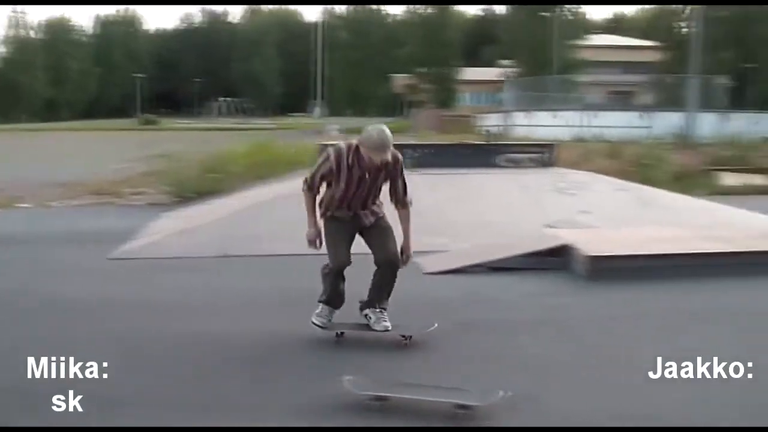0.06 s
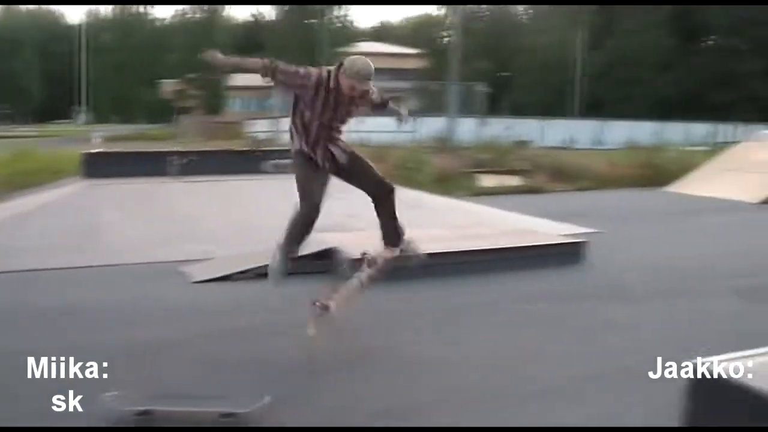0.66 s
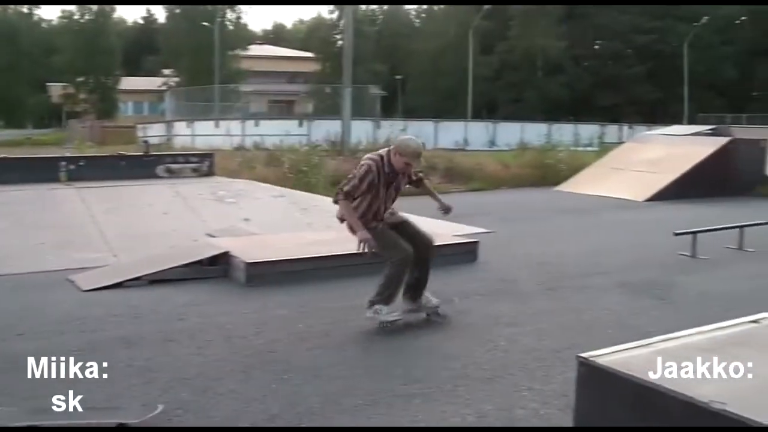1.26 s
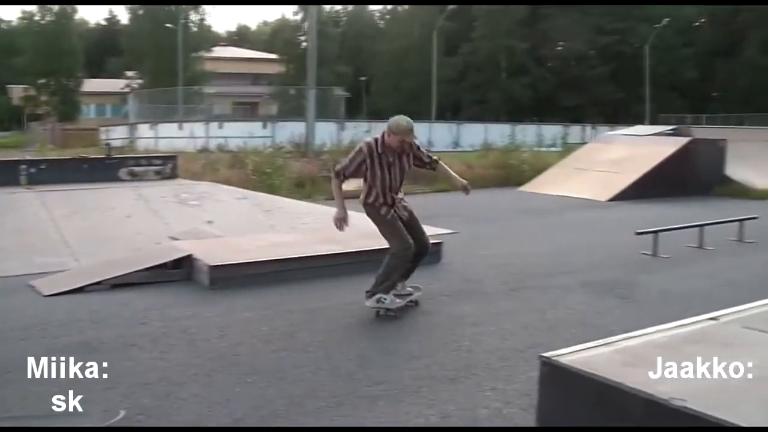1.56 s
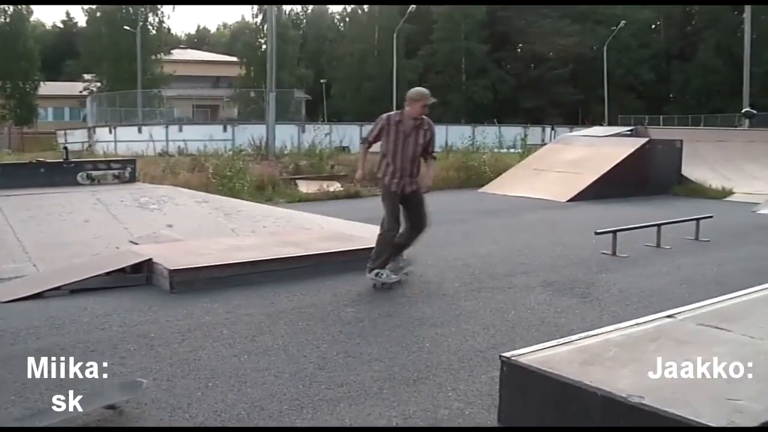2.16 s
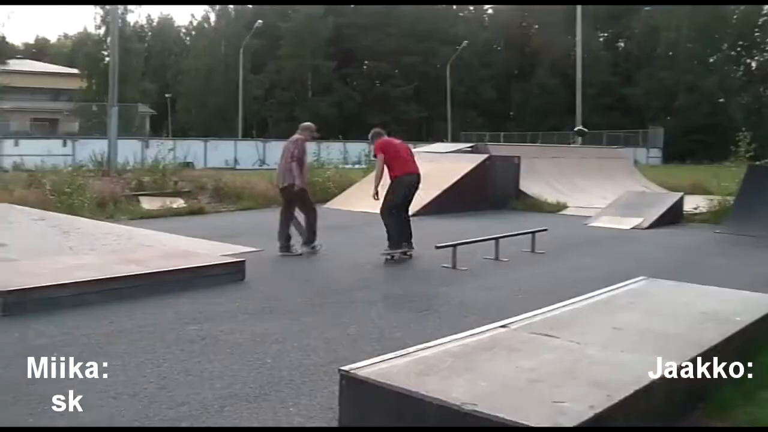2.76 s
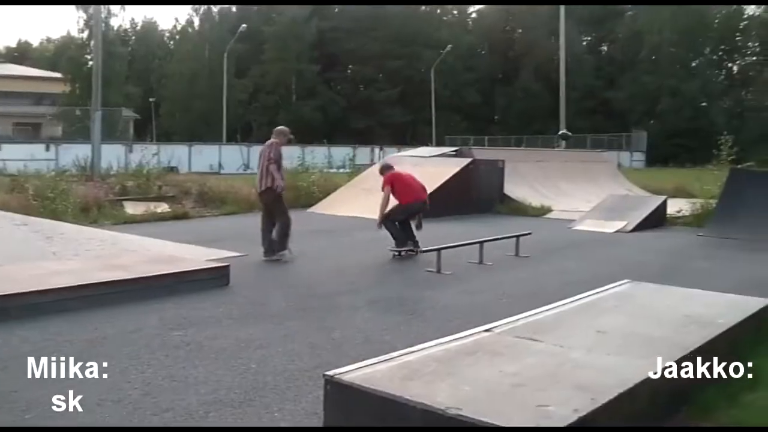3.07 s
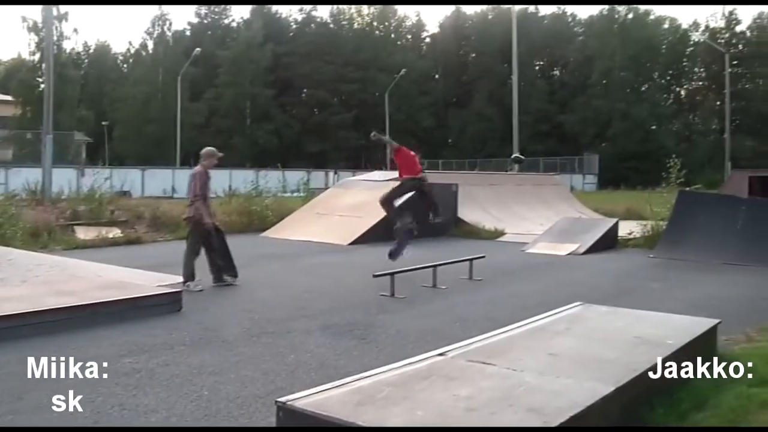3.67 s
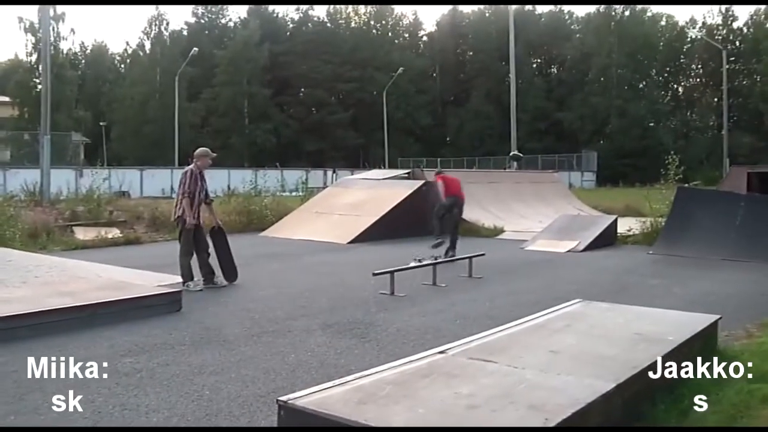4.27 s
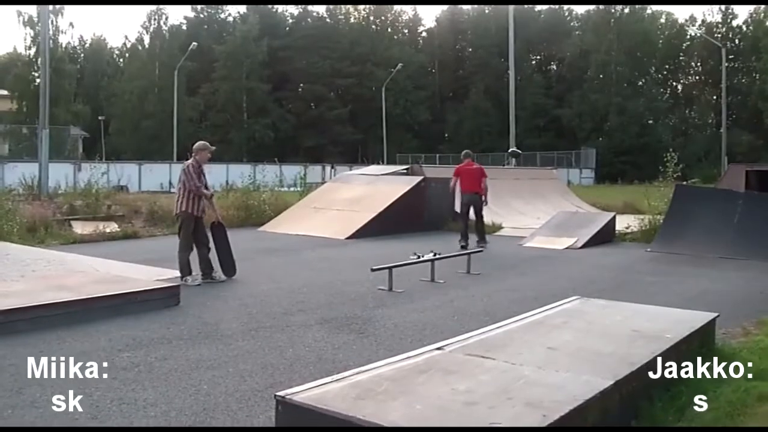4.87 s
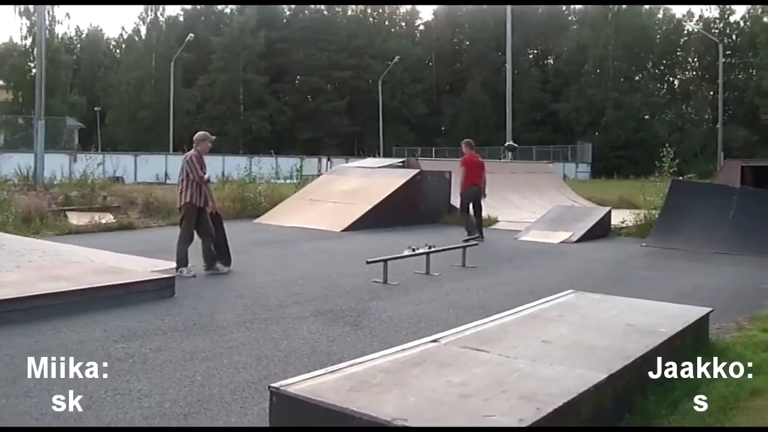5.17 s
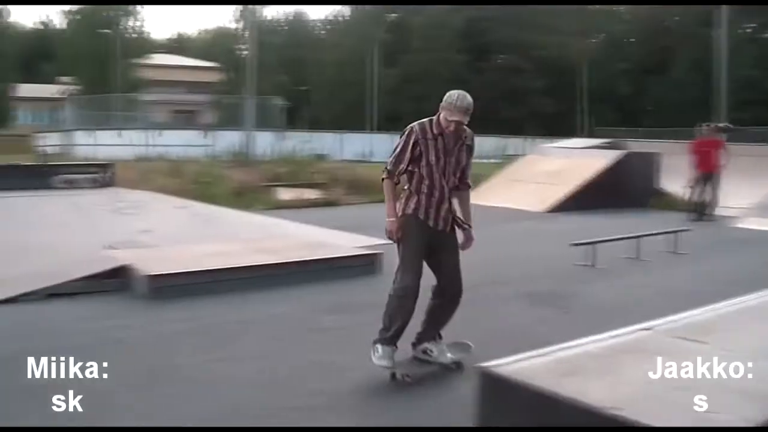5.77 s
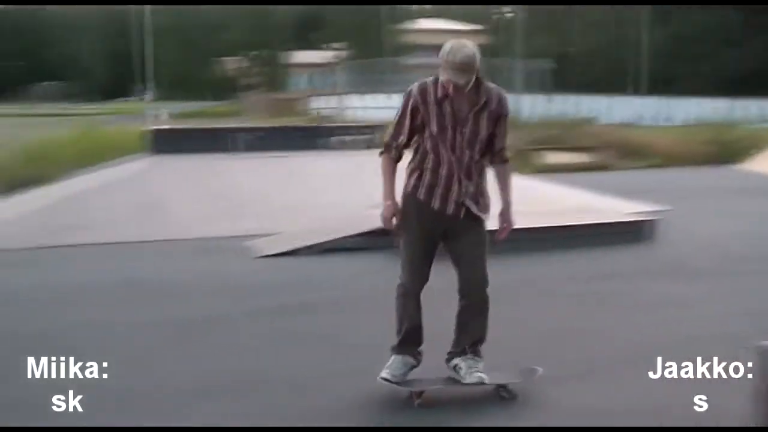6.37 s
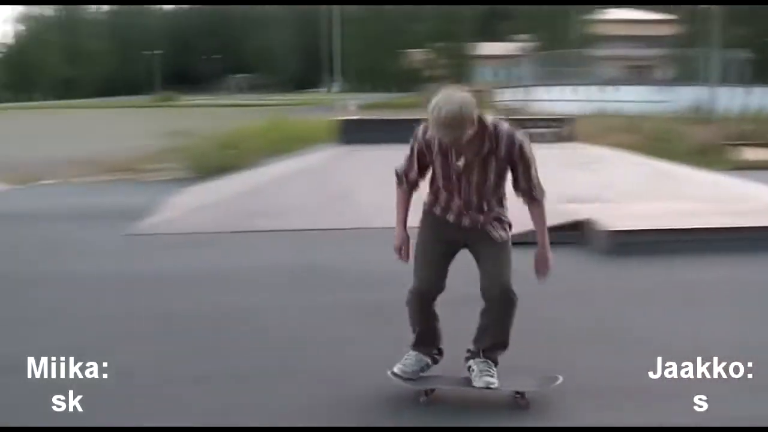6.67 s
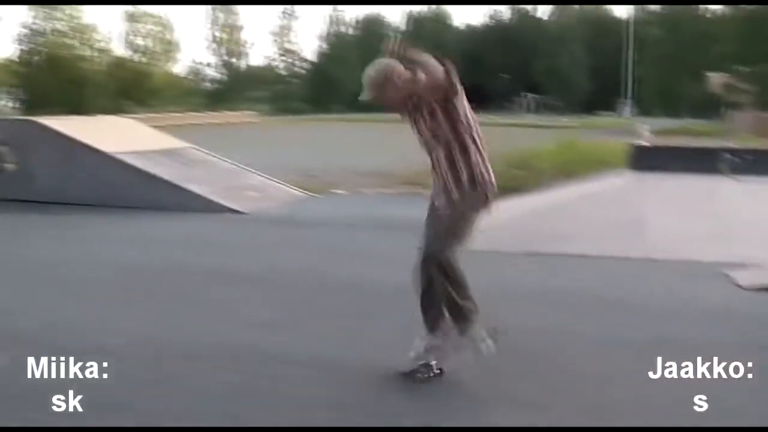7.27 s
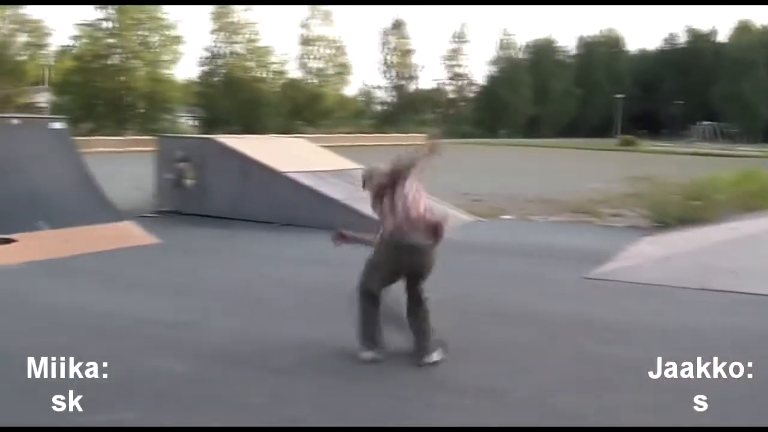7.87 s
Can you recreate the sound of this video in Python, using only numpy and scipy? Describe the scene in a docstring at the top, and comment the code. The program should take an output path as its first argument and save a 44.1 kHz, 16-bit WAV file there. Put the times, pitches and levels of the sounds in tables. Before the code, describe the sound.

Skateboard wheels rumble and hiss over rough asphalt outdoors, close to the microphone. A tail pops and the board slams down, rolls on, then scrapes through a skidding turn with a few clacks. A second trick pops and lands farther off, with more echo, followed by a lull with faint taps. Then loud, close rolling cuts in and leads to another sharp pop and some clacks. Faint distant traffic lies underneath.

```python
"""An outdoor skatepark, where two skaters take turns at flip tricks on the asphalt.
Grit under the wheels drives the wooden deck and the trucks into forced vibration, and the wheels skid
through a turn by stick-slip friction. Tails pop, shoes rasp on grip tape and a loose washer rings;
boards slam down, exciting the deck's modes hard enough to overload the microphone. Ramps return early
reflections and a forest edge a diffuse reverberation, over faint distant traffic."""
import sys
import numpy as np
from scipy import signal
from scipy.fft import rfft, irfft, next_fast_len
from scipy.io import wavfile
from scipy.ndimage import uniform_filter1d

SR = 44100
rng = np.random.default_rng(int(sys.argv[2]) if len(sys.argv) > 2 else 0)


def dump_mix(stems):
    """Bounce the given channels to the path in sys.argv[1] as a 16-bit WAV at rate SR."""
    frames = np.atleast_2d(stems).T  # one column per channel
    limited = np.clip(frames, -1, 1)  # hard clip at full scale
    pcm = np.round(limited * 32767).astype(np.int16)
    wavfile.write(sys.argv[1], SR, pcm)


N = 348831
T = np.arange(N) / SR

# ambient noise spectrum: f/Hz, level/dB
AIR_SPECTRUM = [(25, -8), (55, -1), (85, -4), (125, -7), (400, -6.5), (700, -1.5), (950, -1.5),
                (1500, -6.5), (2200, -11), (4500, -16), (10000, -18), (14000, -19.5), (15500, -28)]
# reverberation bands: f/Hz, level/dB, T60/s
REVERB_BANDS = [(90, 1, 7.4), (310, -5, 1.7), (800, -3, 2.15), (1480, -3, 3), (2570, -4, 2.2),
                (4800, -14, 0.5), (10000, -23, .4)]
# spectrum of the early reflections: f/Hz, gain/dB
RAMP_RESPONSE = [(100, 6), (500, -3.5), (2000, -2), (5000, -0.5), (8000, 3), (14000, -0.5)]
# range of the tricks, which sets their share of echo: t/s, distance/m
TRICK_DISTANCE = [(1.3, 4), (3.5, 10), (5.7, 10), (5.8, 3)]
# difference between the two microphone ports: f/Hz, side minus mid/dB
PORT_WIDTH = [(40, -12), (130, -21.5), (600, -25), (2000, -20.5), (4000, -13), (6500, -4.5), (15000, -5.5)]
# their unequal sensitivity: f/Hz, left minus right/dB
PORT_BALANCE = [(150, 1.2), (600, 0.5), (3000, 0), (8000, -2), (14000, -1.5)]

# rolling level, set by speed and nearness, one curve per ride: t/s, level/dB
RIDE_LEVELS = [
    [(0.0, -19.5), (0.28, -22), (0.44, -22), (0.57, -14), (0.67, -30), (0.72, -24)],
    [(1.26, -32), (1.35, -11.5), (1.46, -21), (1.66, -30.5), (1.88, -27), (2.08, -23.5), (2.24, -14),
     (2.37, -21.5), (2.57, -22.5)],
    [(2.64, -23.5), (2.95, -23), (3.27, -28), (3.605, -22)],
    [(5.796, -14.5), (6.3, -12), (6.48, -8), (6.76, -9.5), (7.1, -14), (7.3, -12.5), (7.45, -9.5)],
]
# each ride's own colour: rattle gain/dB, hiss gain/dB
RIDE_GAINS = [(2.5, 2), (1, 1), (1, 2), (-4, -2.5)]
# the rider loads (+) or unloads (-) the deck: t/s, half length/s, rumble gain/dB
LOAD_CHANGES = [(1.35, 0.018, -2), (2.24, 0.065, -1.5), (6.684, 0.085, -9), (7.334, 0.045, -8)]
# spectra of rumble, wheel hiss and skid: f/Hz, level/dB
RUMBLE_SPECTRUM = [(35, -58), (70, -41), (105, -17), (150, -10.5), (230, -3), (330, -3), (420, -8),
                   (490, -10.5), (550, -19), (900, -14.5), (3000, -50)]
HISS_SPECTRUM = [(80, -40), (600, -11), (1500, 0), (3500, -6), (5200, -9), (7500, -3.5), (10500, -3),
                 (12500, -11), (15500, -8.5)]
SKID_SPECTRUM = [(60, -45), (200, -35), (600, -8), (900, 3), (1400, -1.5), (1950, 2.5), (2600, -7.5),
                 (3600, -6.5), (5200, -15.5), (9000, -15), (15000, -26.5)]
# resonances of the loaded board, then of wheels and axles: f/Hz, bandwidth/Hz, level/dB
BOARD_RESONANCES = [(708, 118, 9.5), (794, 200, -1), (1090, 190, -3.5), (1160, 710, -15), (1600, 1150, -11),
                    (2670, 990, -20.5), (3220, 230, -39)]
WHEEL_RESONANCES = [(1710, 230, 15), (2540, 340, 8.5), (3400, 260, 14), (3840, 43, 4), (4520, 150, 5),
                    (5190, 120, 1), (5930, 110, 3), (9600, 610, -1), (10700, 390, -2)]
# sideways slides: start/s, end/s, attack/s, level/dB, swell/(dB/s)
SLIDES = [(2.09, 2.335, 0.16, -20, -1), (2.404, 2.455, 0.0092, -16, -60),
          (2.503, 2.877, 0.01, -17.5, -16.5), (2.912, 3.012, 0.02, -20.5, 20)]

# normal modes of the washer and of the deck: f/Hz, level/dB, T60/s
WASHER_MODES = [(7300, 7, 0.039), (8800, 8, 0.013), (13950, 8, 0.018)]
DECK_MODES = [(353, -12, 0.11), (631, -5.5, 0.11), (734, 0.5, 0.065), (806.4, -0.5, 0.078),
              (965, -8, 0.078), (1248, -1, 0.072), (1382, -9.5, 0.085), (1803, -3, 0.039),
              (1990, -4.5, 0.072), (2510, -5, 0.05), (3460, 8.5, 0.0041)]
# the washer is set ringing: t/s, level/dB
WASHER_STRIKES = [(.689, -28.5), (0.791, -31.5), (1.088, -22.5)]
# shoes and asphalt rub the grip tape: peak t/s, level/dB, centre f/Hz, cutoff f/Hz
TAPE_RUBS = [(0.715, -29, 3500, 12000), (1.24, -15, 2520, 8050), (3.945, -22.5, 2130, 10300),
             (3.98, -25, 2110, 8000), (4.115, -18.5, 1170, 3460), (4.25, -12.5, 3800, 5170)]
# bumps and feet knock the deck: t/s, level/dB, decay/s, thud/dB
SOFT_IMPACTS = [(0.274, -10, 0.028, -4), (0.356, -16.5, 0.0048, 0), (1.337, -11.5, 0.0084, -8),
                (1.392, -11.5, 0.011, -8), (1.615, -34.5, 0.007, 15), (3.584, -13, 0.0046, -4.5),
                (3.655, -16.5, 0.029, -6), (4.684, -12, 0.003, -7.5), (4.96, -31, 0.051, -22),
                (6.073, -22, 0.0025, 5.5), (6.628, -10, 0.057, -27), (6.742, -9, 0.025, -11),
                (7.408, -19, 0.025, 4)]
# wheels or deck edge slap the ground: t/s, level/dB, ring f/Hz, ring/dB, decay/s
HARD_IMPACTS = [(0.623, -12.5, 970, -6, 0.014), (1.1356, -8, 3600, 1, 0.006),
                (1.168, -12.5, 2420, 1, 0.0054), (1.537, -7.5, 1390, -3, 0.0036),
                (2.395, -4, 1760, -6, 0.012), (2.502, -7.5, 1200, -3, 0.014),
                (2.8996, -7.5, 3770, -3, 0.0041), (3.9194, -21.5, 2000, 7, 0.0059),
                (4.070, -19.5, 1090, 0, 0.011), (4.088, -19.5, 1110, 0, 0.0066),
                (4.2153, -2, 1780, -15, 0.0056), (4.322, -39, 1400, -5, 0.003),
                (4.411, -34, 1410, 12, 0.0065), (4.71, -26, 1350, -3, 0.0045),
                (5.037, -33.5, 746, -16, 0.013), (5.317, -37, 990, -5, 0.004),
                (6.809, -17.5, 1690, -14, 0.003), (7.704, -32.5, 3700, -20, 0.0018),
                (7.856, -16, 750, -1, 0.011), (7.879, -16, 845, -1, 0.0091)]
# the tail strikes and a shoe flicks: t/s, level/dB, ring f/Hz, decay/s, flick level/dB
TAKE_OFFS = [(0.7302, -5, 2100, 0.0053, -19), (3.68, -2.5, 1770, 0.0031, -25.5),
             (7.4595, 2, 826, 0.007, -18)]
# the board lands: t/s, level/dB, rebound gap/s, step per rebound/dB, rebound f/Hz, thud/dB
LANDINGS = [(1.180, 5.5, 0.0105, -2, 733, -6.5), (4.134, 5.5, 0.013, -3.5, 1260, -13.5)]


def undb(db):
    """Amplitude ratio of a level in decibels."""
    return 10 ** (np.asarray(db) / 20)


def unit(x):
    """Normalisation to rms 1."""
    return x / np.sqrt(np.mean(x ** 2))


def unit_energy(x):
    """Normalisation of a transient to the energy of 10 ms at rms 1."""
    return x / np.sqrt(np.sum(x ** 2) / (SR / 100))


def curve(rows):
    """Linear interpolation of (t/s, value) points."""
    return np.interp(T, *np.transpose(rows))


def add(out, s, x):
    """Superposition of a transient at time s."""
    i = int(s * SR)
    out[i:i + len(x)] += x[:N - i]


def shape(x, response):
    """Linear filtering: the spectrum times a frequency response."""
    size = next_fast_len(len(x) + 2048)
    f = np.maximum(np.arange(size // 2 + 1) * SR / size, 1)
    return irfft(rfft(x, size) * response(f), size)[:len(x)]


def colour(x, points):
    """Zero-phase filtering through (f/Hz, gain/dB) points."""
    hz, db = np.transpose(points)
    return shape(x, lambda f: undb(np.interp(np.log(f), np.log(hz), db)))


def soften(x, cutoff_hz):
    """Second-order low-pass filtering."""
    return shape(x, lambda f: 1 / (1 + np.sqrt(2) * 1j * f / cutoff_hz - (f / cutoff_hz) ** 2))


def resonance(f, hz, width):
    """Response of a damped oscillator, gain 1 at its centre."""
    return 1 / (1 + 1j * (f * f - hz * hz) / (f * width))


def walk(rate):
    """Slow random modulation with a spread near 1."""
    knots = rng.standard_normal(4096)
    return 1.2 * np.interp(T * rate, np.arange(len(knots)), knots)


def grit(rate, spread_db):
    """Shot noise: independent clicks of unequal size, rate per second."""
    hit = rng.random(N) < rate / SR
    return unit(hit * rng.standard_normal(N) * undb(spread_db * np.minimum(rng.exponential(size=N), 4)))


def ring(modes, t, detune):
    """Free vibration: a sum of damped modes, detuned a little at each strike."""
    hz, db, t60 = np.transpose(modes)[:, :, None]
    shift, polarity = rng.standard_normal((2, len(modes), 1))
    waves = np.sin(2 * np.pi * hz * (1 + detune * shift) * t) * np.exp(-np.log(1000) * t / t60)
    return np.sum(np.sign(polarity) * undb(db) * waves, axis=0)


def air(level_db=-42.5):
    """Ambient noise: distant traffic, trees and a faint hiss add incoherently."""
    return unit(colour(rng.standard_normal(N), AIR_SPECTRUM)) * undb(level_db + 0.28 * walk(6))


def reverberation(x):
    """Scattering by trees and fences forms a diffuse field whose treble decays first."""
    t, wash = T[:2 * SR], 0
    for hz, db, t60 in REVERB_BANDS:
        band = lambda f: resonance(f, hz, 0.82 * hz) ** 2
        decay = (1 - np.exp(-t / .04)) * undb(-120 * t / t60)  # energy falls 60 dB in t60
        energy = signal.fftconvolve(shape(x, band) ** 2, decay / decay.sum())[:N]
        carrier = unit(shape(rng.standard_normal(N), band))
        wash = wash + undb(db) * np.sqrt(np.abs(energy)) * carrier
    return wash * undb(1.5 * walk(35))


def ramp_echoes(x):
    """Early reflections from the nearest ramps arrive in a dense cluster."""
    t = T[:SR // 3]
    envelope = (1 - np.exp(-t / 0.048)) * np.exp(-t / 0.031)
    cluster = unit(rng.standard_normal(len(t)) * envelope) / np.sqrt(len(t))
    return colour(signal.fftconvolve(x, cluster)[:N], RAMP_RESPONSE)


def underside(x):
    """Interference of reflections between deck and asphalt combs the treble."""
    t = T[:SR // 100]
    bounces = rng.standard_normal(len(t)) * np.exp(-t / 0.002) * (t > .0007)
    bounces = colour(bounces / np.sqrt(np.sum(bounces ** 2)), [(1200, -36), (4000, -29), (15000, -10)])
    return unit(x + signal.fftconvolve(x, bounces)[:N])


def board_response(f):
    """Modal superposition: the loaded board's resonances, each narrowed by a broad band-pass."""
    return sum(undb(db) * resonance(f, hz, width) * resonance(f, hz, 0.96 * hz)
               for hz, width, db in BOARD_RESONANCES)


def wheel_response(f):
    """Modal superposition: the lightly damped resonances of wheels and axles."""
    return sum(undb(db) * resonance(f, hz, width) for hz, width, db in WHEEL_RESONANCES)


def rolling(rotation_hz=23.95, usual_db=-20):
    """Forced vibration: stones in the asphalt shake deck and trucks while the urethane hisses."""
    drive_db = curve([row for ride in RIDE_LEVELS for row in ride]) - usual_db
    load_db = sum(db * np.exp(-((T - s) / length) ** 2) for s, length, db in LOAD_CHANGES)
    bumps = walk(110)  # coarse patches shake everything at once
    angle = 2 * np.pi * np.cumsum(rotation_hz * (1 + 0.0732 * walk(4.3))) / SR
    worn_spot = np.exp(5 * (np.cos(angle) - 1))  # comes round once a turn
    stones = grit(rate=3000, spread_db=-1) * undb(2.4 * bumps)
    sand = grit(rate=18000, spread_db=4.5) * undb(2.3 * bumps + worn_spot)
    ticks = grit(rate=1300, spread_db=0.5) * undb(1.55 * bumps + 6.6 * worn_spot)
    roughness = grit(rate=4000, spread_db=2) * undb(0.16 * bumps)
    rumble = unit(colour(roughness, RUMBLE_SPECTRUM)) * undb(-22 + 0.89 * drive_db + load_db)
    rattle = unit(shape(stones, board_response)) * undb(-25.5 + drive_db)
    # the wheels ring out when fast and lightly loaded
    wheel_ring = unit(shape(ticks, wheel_response)) * undb(-4.5 + 0.37 * drive_db - 0.56 * load_db)
    tread = underside(colour(sand + 0.33 * stones, HISS_SPECTRUM))
    hiss = (tread + wheel_ring) * undb(-35 + 0.84 * drive_db)
    out = np.zeros(N)
    for ride, (rattle_db, hiss_db) in zip(RIDE_LEVELS, RIDE_GAINS):
        start, end = ride[0][0], ride[-1][0]
        grounded = uniform_filter1d(1. * ((T >= start) & (T <= end)), size=400)
        out += grounded * (rumble + undb(rattle_db) * rattle + undb(hiss_db) * hiss)
    return out


def skid(grip_s=0.0037, trail_db=-15, trail_s=0.07):
    """Stick-slip friction: sideways wheels judder, then grip again with a faint trailing scrape."""
    slips = grit(rate=6000, spread_db=1.6) * undb(2.2 * walk(130))
    envelope = np.zeros(N)
    for start, end, attack, db, swell in SLIDES:
        held = np.clip(T - start, 0, end - start)
        after = np.maximum(T - end, 0)
        release = np.maximum(np.exp(-after / grip_s), undb(trail_db) * np.exp(-after / trail_s))
        envelope += np.minimum(held / attack, 1) * undb(db + swell * held) * release
    return underside(colour(slips, SKID_SPECTRUM)) * envelope


def washer_pings():
    """Free vibration of a loose washer on the axle swells into a brief, bright ring."""
    out, t = np.zeros(N), T[:SR // 5]
    swell = 1 - np.exp(-t / 0.007)
    for s, db in WASHER_STRIKES:
        add(out, s, undb(db) * unit_energy(ring(WASHER_MODES, t, detune=0.0033) * swell))
    return out


def rasp(s, hz, cutoff_hz, rise_s, fall_s):
    """Friction noise: the grains of the grip tape click in a swell that peaks at time s."""
    out = np.zeros(N)
    grain = grit(rate=9000, spread_db=4) * undb(2.6 * walk(200))
    near = (T > s - 2 * rise_s) & (T < s + 5 * fall_s)
    t = T[near] - s
    rub = shape(grain[near], lambda f: resonance(f, hz, hz))
    envelope = np.exp(np.where(t < 0, -(t / rise_s) ** 2, -t / fall_s))
    out[near] = unit(soften(soften(rub, cutoff_hz), cutoff_hz)) * envelope
    return out


def scuffs():
    """Sliding friction on the grip tape around take-offs and landings."""
    return sum(undb(db) * rasp(s, hz, cutoff_hz, rise_s=0.017, fall_s=0.021)
               for s, db, hz, cutoff_hz in TAPE_RUBS)


def impact(ring_hz, decay_s, ring_db, thud_db, cutoff_hz):
    """Impulsive excitation: a crack, a contact ring, the deck's modes and the rider's weight thudding."""
    t = T[:SR // 5]
    fade = (1 - np.exp(-t / 0.00098)) * np.exp(-t / decay_s)
    chatter = rng.standard_normal((3, len(t))) * fade
    crack = unit_energy(shape(chatter[0], lambda f: resonance(f, 2200, 17500)))
    judder = unit_energy(shape(chatter[1], lambda f: resonance(f, ring_hz, .5 * ring_hz) ** 2))
    damping = np.exp(-t * ring_hz / 9)  # high rings die first
    contact = unit_energy(np.sin(2 * np.pi * ring_hz * t) * fade * damping)
    deck = unit_energy(ring(DECK_MODES, t, detune=0.0524))
    thud = unit_energy(shape(chatter[2], lambda f: resonance(f, 294, 130) * resonance(f, 110, 1060)))
    wood = crack + undb(0.5) * judder + undb(ring_db) * contact + undb(1) * deck
    return unit_energy(soften(wood, cutoff_hz)) + undb(thud_db) * thud


def knocks(ring_hz=681):
    """Compliant contacts excite little treble and ring the deck at its main resonance."""
    out = np.zeros(N)
    for s, db, decay_s, thud_db in SOFT_IMPACTS:
        add(out, s, undb(db) * impact(ring_hz, decay_s, ring_db=9, thud_db=thud_db, cutoff_hz=2500))
    return out


def clacks():
    """Stiff contacts with the ground excite a wide, bright spectrum."""
    out = np.zeros(N)
    for s, db, ring_hz, ring_db, decay_s in HARD_IMPACTS:
        add(out, s, undb(db) * impact(ring_hz, decay_s, ring_db, thud_db=-9.5, cutoff_hz=8100))
    return out


def tail_pops(flick_lag_s=0.05):
    """Impact, then friction: the tail cracks on the asphalt and the front shoe flicks up the tape."""
    out = np.zeros(N)
    for s, db, ring_hz, decay_s, flick_db in TAKE_OFFS:
        add(out, s, undb(db) * impact(ring_hz, decay_s, ring_db=-10.5, thud_db=-11, cutoff_hz=5000))
        flick = rasp(s + flick_lag_s, hz=2310, cutoff_hz=25000, rise_s=0.053, fall_s=0.031)
        out += undb(flick_db) * flick
    return out


def slams(contacts=4, first_ring_hz=2030):
    """Inelastic collision: a hard landing, then lower-pitched rebounds, each weaker than the last."""
    out = np.zeros(N)
    for s, db, gap, step_db, rebound_hz, thud_db in LANDINGS:
        for k in range(contacts):
            ring_hz = rebound_hz if k else first_ring_hz
            hit = impact(ring_hz, decay_s=0.005, ring_db=-13, thud_db=thud_db, cutoff_hz=5400)
            add(out, s + k * gap, undb(db + k * step_db) * hit)
    return out


def stereo_ports(x, crossover_hz=900):
    """Spatial coherence: two close microphone ports agree in the bass and drift apart in the treble."""
    side = colour(x, PORT_WIDTH)
    bass = shape(side, lambda f: 1j / (1 + (f / crossover_hz) ** 4))  # a slight lag between the ports
    treble = shape(side, lambda f: 1 / (1 + (crossover_hz / f) ** 4))
    scatter = irfft(np.exp(2j * np.pi * rng.random(65)))
    drift = np.sqrt(2) * np.sin(np.cumsum(walk(130)) * 200 / SR)  # their likeness keeps changing
    side = bass + signal.fftconvolve(treble, scatter)[:N] * drift
    left = colour(x + side, [(hz, db / 2) for hz, db in PORT_BALANCE])
    right = colour(x - side, [(hz, -db / 2) for hz, db in PORT_BALANCE])
    return np.array([left, right])


def scene():
    """Superposition of direct sound, echoes and air; a trick's share of echo grows with distance."""
    wheels = rolling() + skid()
    tricks = tail_pops() + slams() + clacks() + knocks() + scuffs() + washer_pings()
    echo_db = -19.5 + 3.5 * np.log2(curve(TRICK_DISTANCE))  # 3.5 dB per doubling of distance
    outward = wheels * undb(-6) + tricks * undb(echo_db)
    echoes = undb(-3) * ramp_echoes(outward) + undb(-8) * reverberation(outward)
    return stereo_ports(wheels + tricks + echoes + air())


def record(dry):
    """Overload: clipping flattens the loudest blows, and a steep low-pass limits the bandwidth."""
    clipped = np.clip(dry, -1, 1)
    return signal.sosfilt(signal.ellip(10, .1, 70, 15400, fs=SR, output="sos"), clipped)


dry = scene()
out = record(dry)
dump_mix(out)
```